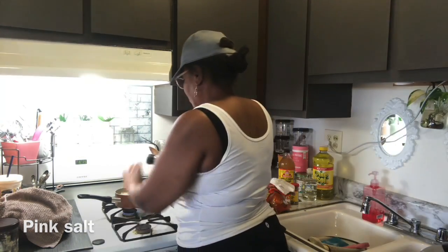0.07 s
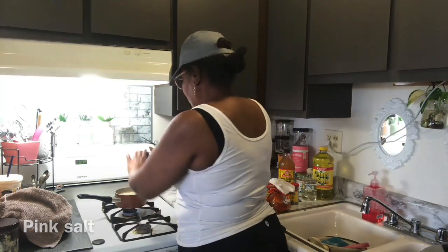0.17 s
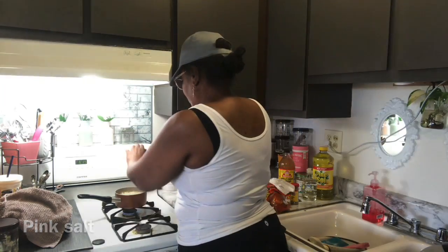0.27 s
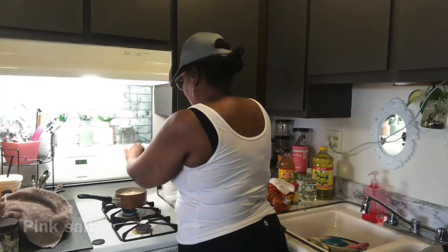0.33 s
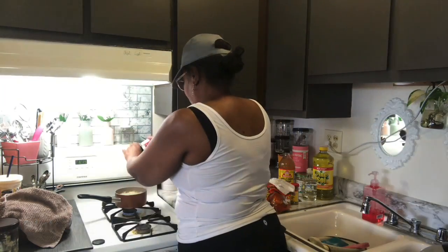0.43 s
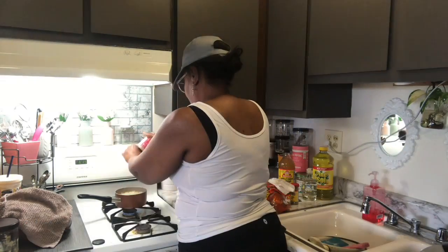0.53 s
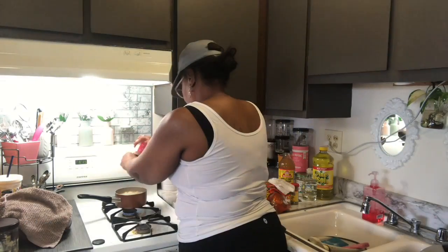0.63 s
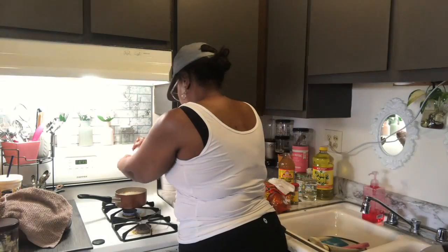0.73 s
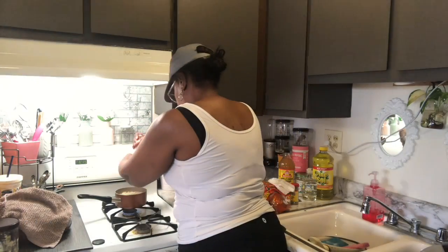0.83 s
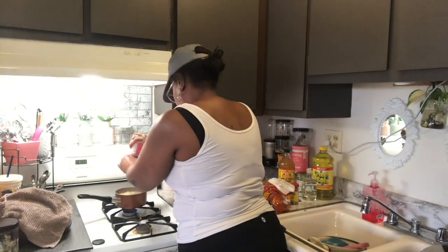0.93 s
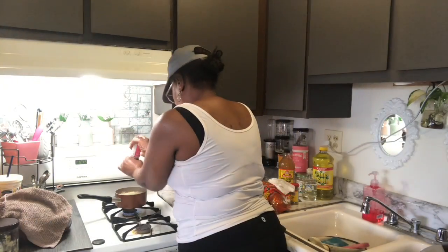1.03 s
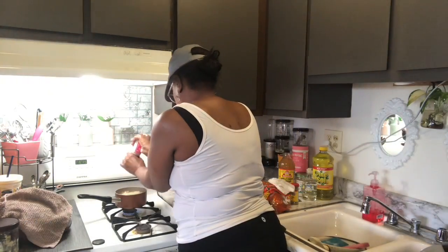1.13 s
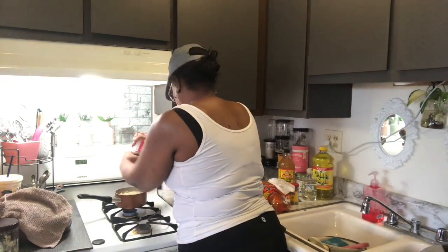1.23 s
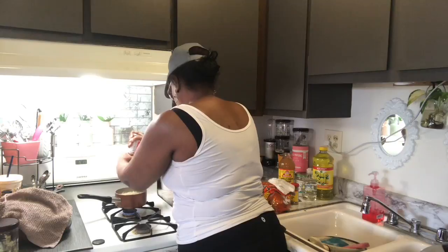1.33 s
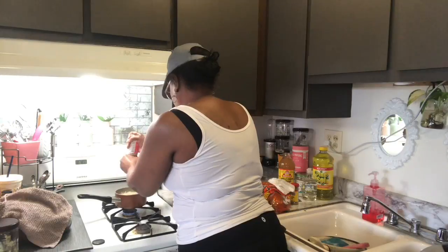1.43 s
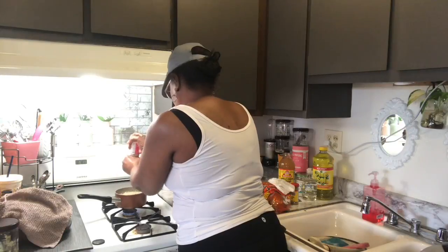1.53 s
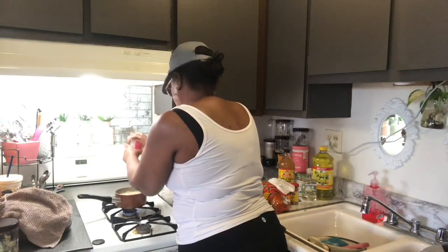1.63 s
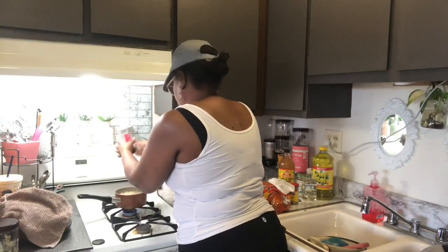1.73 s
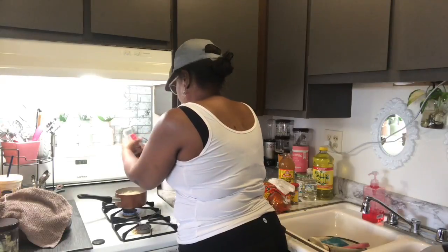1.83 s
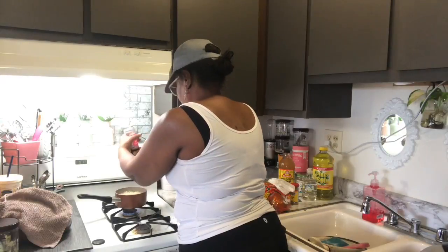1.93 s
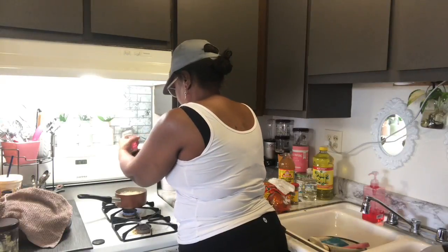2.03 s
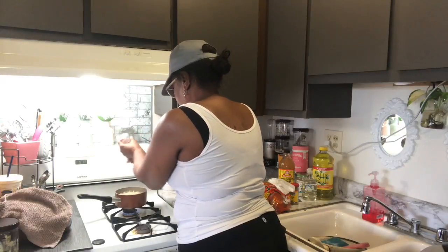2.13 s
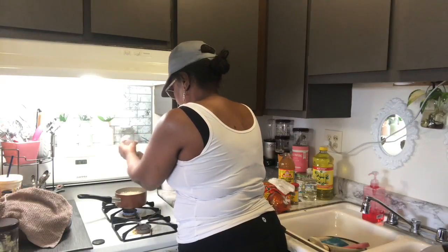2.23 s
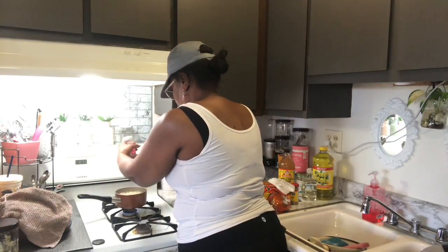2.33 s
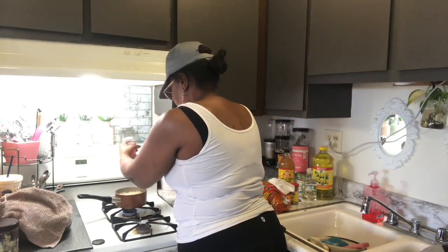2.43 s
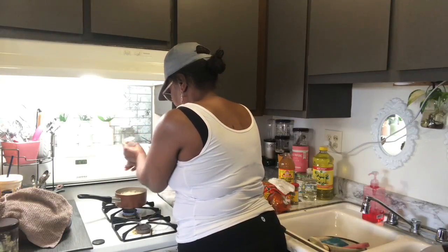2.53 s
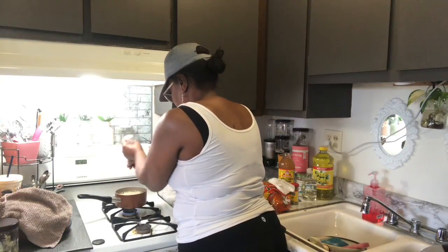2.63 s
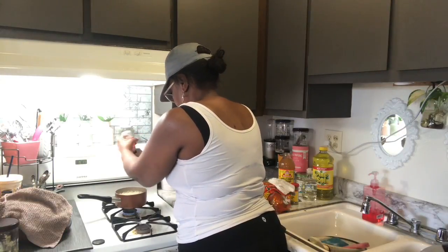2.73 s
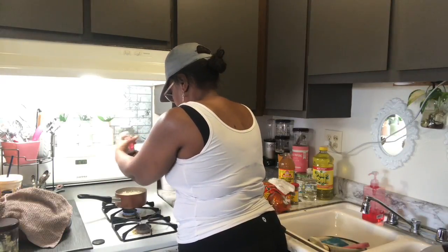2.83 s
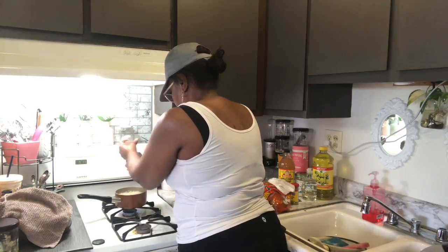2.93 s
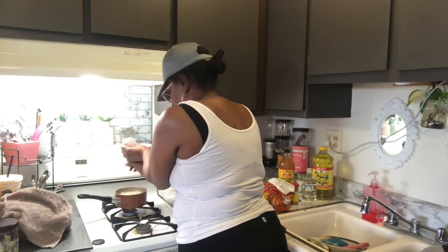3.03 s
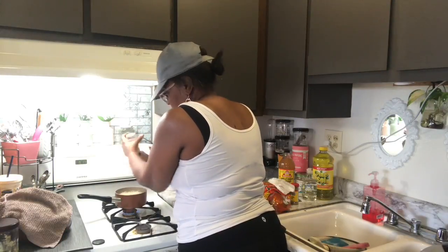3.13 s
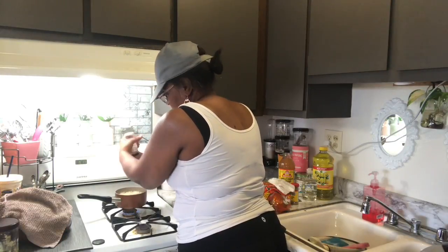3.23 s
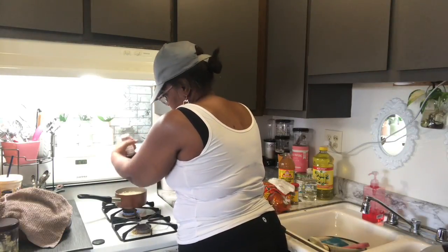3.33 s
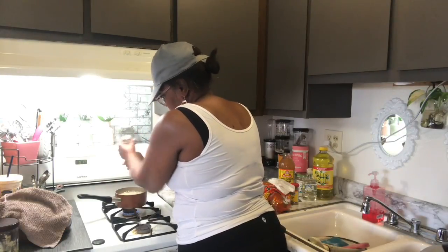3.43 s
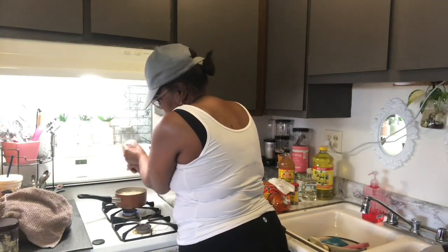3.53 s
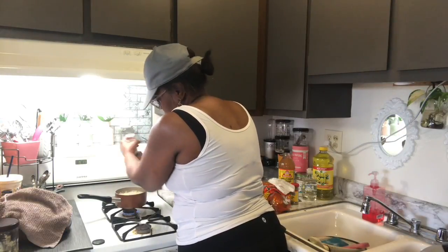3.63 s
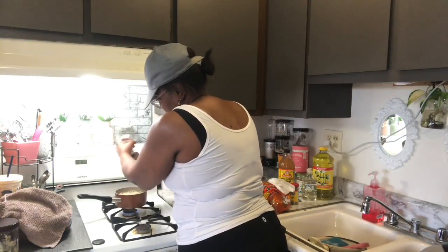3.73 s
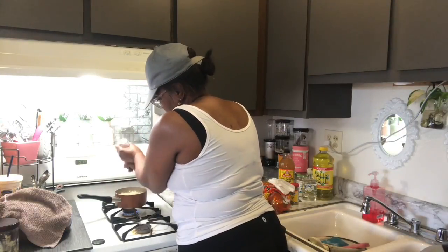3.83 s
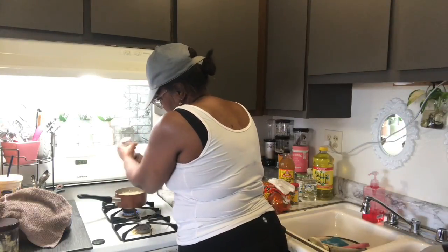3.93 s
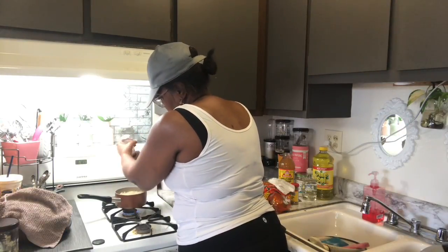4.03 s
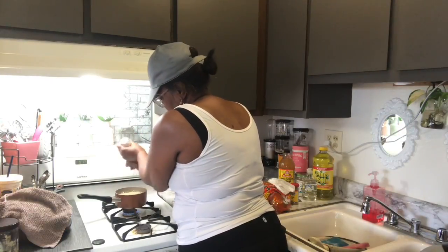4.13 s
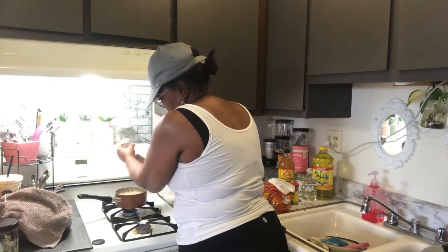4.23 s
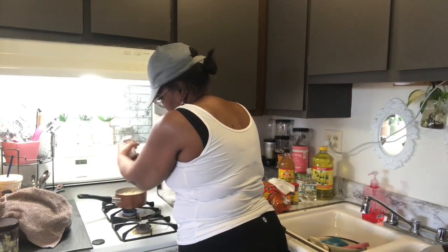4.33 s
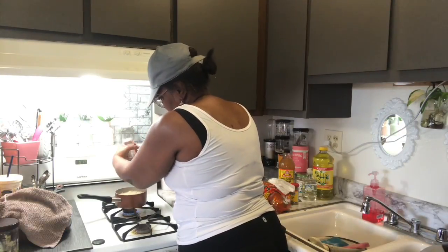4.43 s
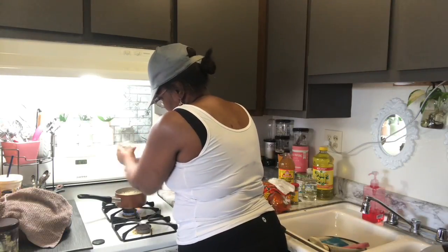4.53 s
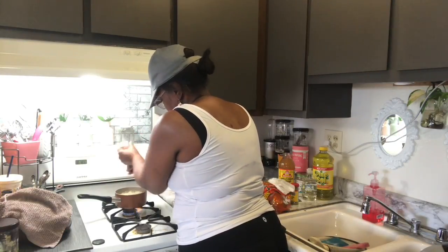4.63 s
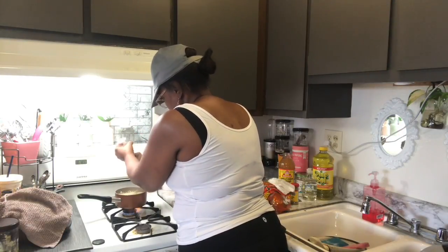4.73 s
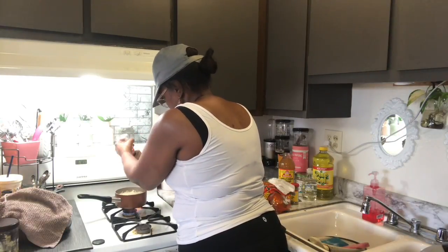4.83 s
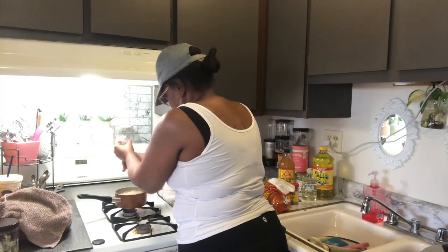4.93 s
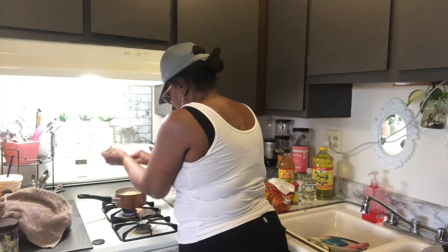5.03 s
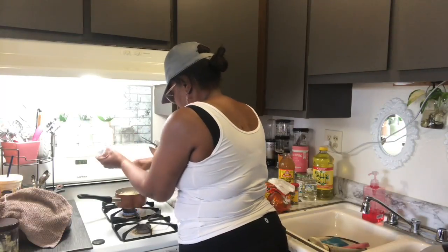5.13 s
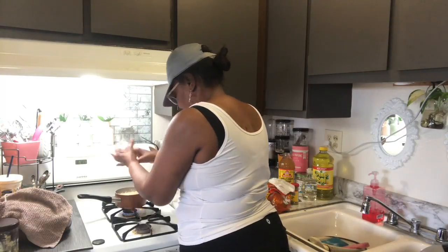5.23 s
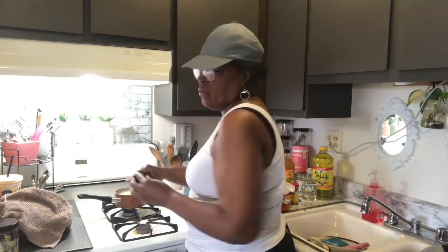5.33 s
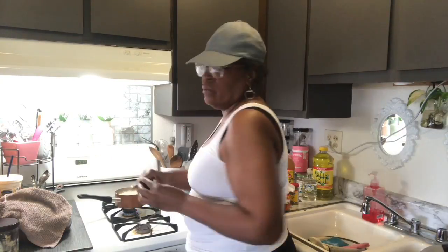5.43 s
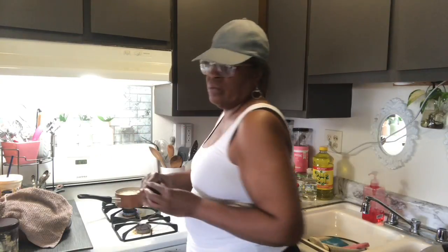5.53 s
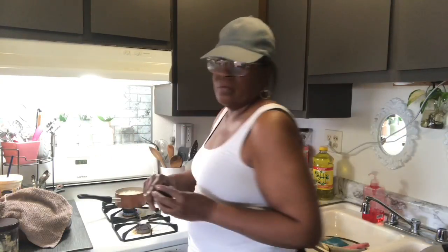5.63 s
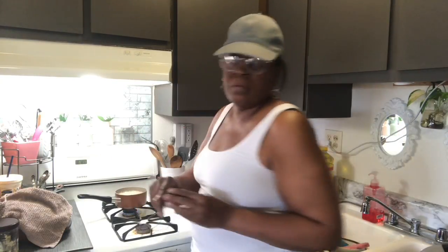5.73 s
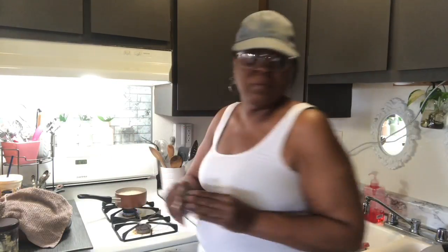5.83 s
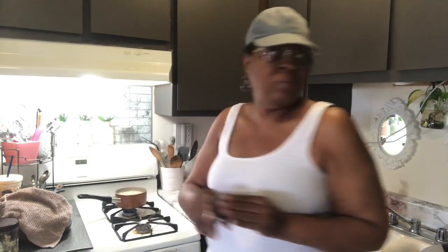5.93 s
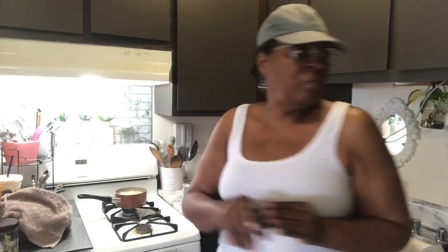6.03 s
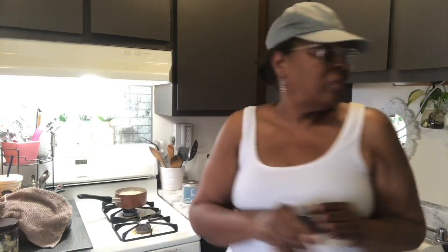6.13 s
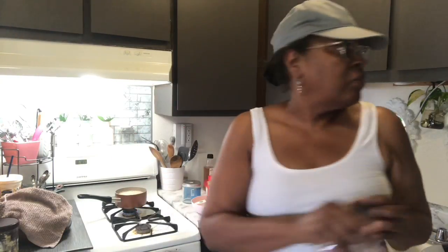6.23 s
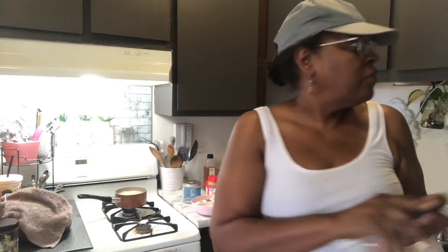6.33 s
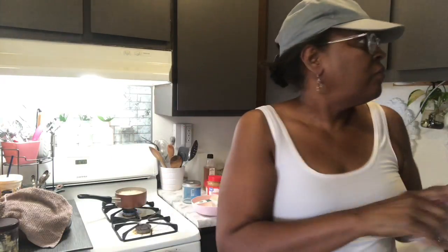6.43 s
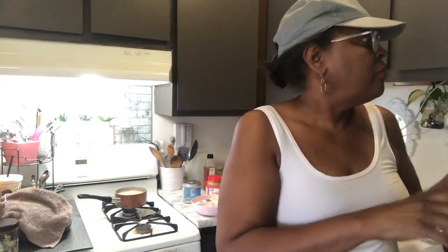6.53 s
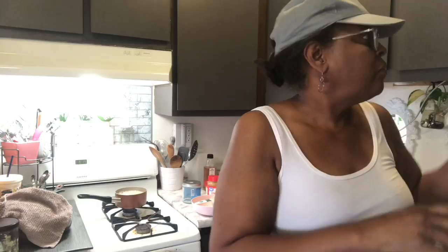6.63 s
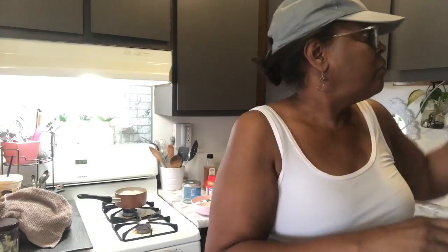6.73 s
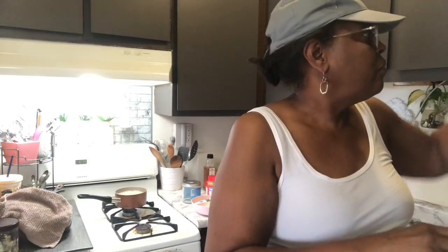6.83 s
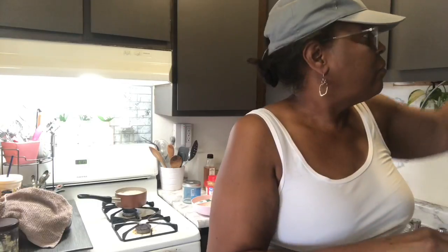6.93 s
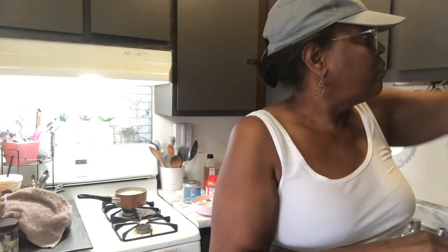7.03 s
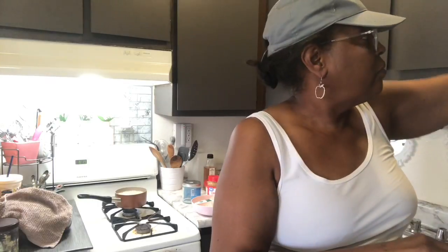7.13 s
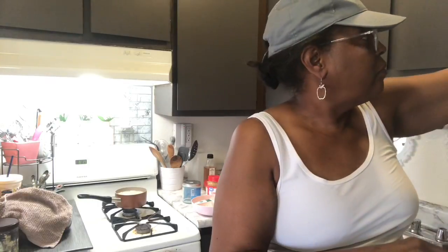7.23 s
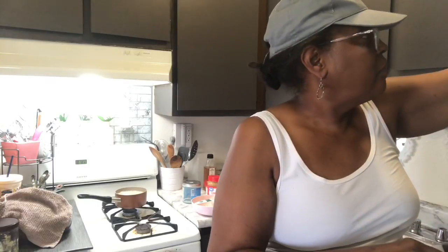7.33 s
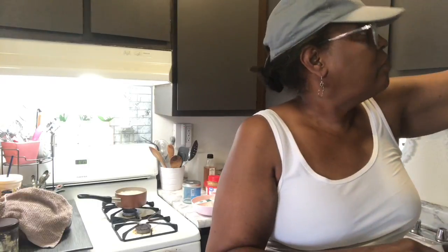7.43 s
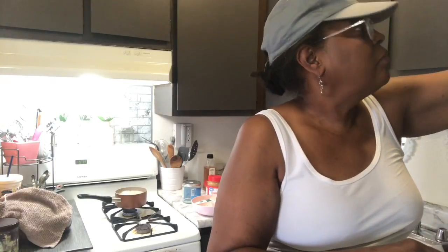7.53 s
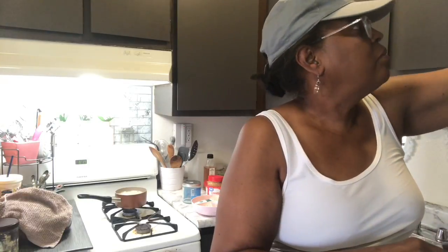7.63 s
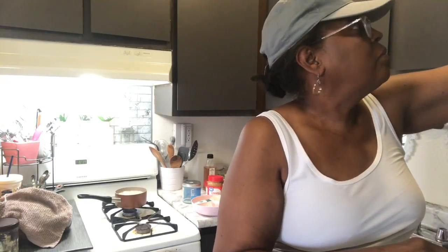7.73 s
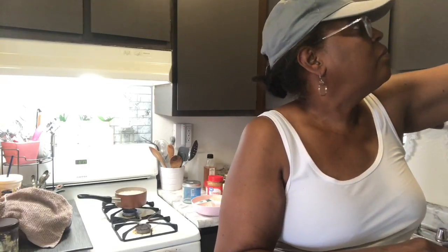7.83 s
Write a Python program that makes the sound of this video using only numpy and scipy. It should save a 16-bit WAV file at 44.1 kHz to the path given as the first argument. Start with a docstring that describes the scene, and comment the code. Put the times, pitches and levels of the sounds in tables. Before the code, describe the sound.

Loose salt rattles briefly in a hand grinder. Then quick twists crack the crystals in uneven, gritty bursts for about four seconds, with one short pause. Fingers rub and tap the jar, and the cap shuts with a sharp snap, the loudest sound. Small ticks and soft hollow thuds follow as it is put away. The microphone picks up light kitchen reverberation, faint room air and a low hum.

```python
"""Loose salt rattles in a hand grinder; then crystals crack under quick twists, ringing its shell.
Hands rub and tap the jar, the cap snaps shut, and it is put away with small ticks and hollow thuds.
The kitchen walls reverberate, and room air and a low hum lie underneath. During the twisting the hum
and the air's rumble sit about an octave higher; the grinding's reverberation is higher and shorter."""
import sys
import numpy as np
from scipy import signal
from scipy.fft import rfft, irfft, next_fast_len
from scipy.io import wavfile
from scipy.ndimage import map_coordinates

SR = 44100
rng = np.random.default_rng(int(sys.argv[2]) if len(sys.argv) > 2 else 0)


def output_pcm(signal):
    """Save a mono or channel-first signal as 16-bit PCM at the path in sys.argv[1].

    Samples are clipped to [-1, 1] before scaling.
    """
    pcm = np.clip(np.atleast_2d(signal).T, -1, 1) * 32767
    wavfile.write(sys.argv[1], SR, np.round(pcm).astype(np.int16))


N = 347633

# turns of the wrist: (start [s], length [s], grit level [dB], treble relative to it [dB])
TWISTS = [(0.496, 0.091, -80, 9.5), (0.847, 0.12, -71, 0), (1.136, 0.099, -63, -15),
          (1.336, 0.089, -76, -13), (2.046, 0.082, -60, -10), (2.21, 0.15, -66, -8),
          (2.447, 0.14, -58.5, -16), (2.64, 0.071, -73, -7), (2.87, 0.18, -67, -16), (3.184, .07, -75, -9),
          (3.352, .12, -62, -13), (3.541, .12, -62, -4.5), (3.757, 0.059, -60, -14),
          (3.854, 0.085, -60, -1), (4.037, 0.096, -58, -16), (4.163, 0.25, -63.5, -4),
          (4.593, 0.14, -76, -6)]


def amp(db):
    return 10 ** (np.asarray(db) / 20)


def unit(x):
    return x / np.sqrt(np.mean(x ** 2) + 1e-20)


def at_peak(x, db):
    return amp(db) * x / np.abs(x).max()


def along(points, hz):
    """Interpolation of (frequency [Hz], value) points on a logarithmic axis."""
    f, v = np.transpose(points)
    return np.interp(np.log(hz + 1), np.log(f + 1), v)


def wobble(per_s):
    """Random modulation: a spline through Gaussian values."""
    return map_coordinates(rng.standard_normal(int(N * per_s / SR) + 4), [np.arange(N) * per_s / SR])


def held(start_s, end_s, rise_s, fall_s):
    """Envelope: linear attack, hold at 1, exponential decay."""
    t = np.arange(N) / SR
    return np.clip((t - start_s) / rise_s, 0, 1) * np.exp(-np.maximum(t - end_s, 0) / fall_s)


def filtered(x, response):
    """Linear filtering: the spectrum of x times a frequency response."""
    m = next_fast_len(len(x) + SR // 2)
    return irfft(rfft(x, m) * response(np.fft.rfftfreq(m, 1 / SR)), m)[:len(x)]


def causal(spectrum):
    """Minimum-phase response of unit energy, made by folding the cepstrum."""
    def response(hz):
        gain = amp(np.maximum(along(spectrum, hz), -80))
        cepstrum = irfft(np.log(gain / np.sqrt(np.mean(gain ** 2))))
        cepstrum[1:len(cepstrum) // 2] *= 2
        cepstrum[len(cepstrum) // 2 + 1:] = 0
        return np.exp(rfft(cepstrum))
    return response


def mode(hz, centre_hz, width_hz):
    """Second-order resonance, gain 1 at its centre."""
    return 1j * hz * width_hz / (centre_hz ** 2 - hz ** 2 + 1j * hz * width_hz)


def grit(n, per_s, spread_db):
    """Shot noise: random impulses of either sign and log-normal size, rms 1."""
    impulses = (rng.random(n) < per_s / SR) * np.sign(rng.random(n) - .5)
    return unit(impulses * amp(spread_db * rng.standard_normal(n)))


def add(track, s, sound):
    """Superposition of a sound on a track, from time s."""
    part = track[round(s * SR):][:len(sound)]
    part += sound[:len(part)]


def room_air(raised):
    """Spectrally shaped noise: rumble and hiss, crossfading to a second colour as raised goes to 1."""
    # spectra of the air's rumble, its usual hiss and its hiss while twisting: (frequency [Hz], level [dB])
    rumble = [(13, -56), (22, -21.5), (75, -5.5), (119, -11.5), (372, -14.5), (466, -20), (592, -22.5),
              (742, -22.5), (800, -24), (1040, -65), (1760, -120)]
    hiss = [(500, -42), (800, -2), (1400, -2), (2800, -3.5), (3600, -7), (4600, -10), (5000, -14.5),
            (5500, -8), (7200, -10), (8500, -15), (10000, -19.5), (10500, -20), (11200, -17.5),
            (15800, -20)]
    twist_hiss = [(940, -30), (1600, -6.5), (2220, -4), (2350, -12), (2610, 1), (3130, -5.5), (3480, -6.5),
                  (4910, -8), (6180, -5.5), (9690, -17), (11300, -17), (13600, -22), (15800, -20)]

    def noise(colour, pitch, db):
        return amp(db) * unit(filtered(rng.standard_normal(N), lambda hz: amp(along(colour, hz / pitch))))
    air = (1 - raised) * (noise(rumble, pitch=0.92, db=-64.5) + noise(hiss, pitch=0.99, db=-68.5))
    air += raised * (noise(rumble, pitch=1.8, db=-64) + noise(twist_hiss, pitch=0.94, db=-67.5))
    return air * amp(1.1 * wobble(6))


def hum(raised, hum_hz=58.4, flicker_db=2):
    """A tone with random phase and amplitude modulation, an octave up where raised is 1."""
    # slow wavering of the hum: (time [s], level [dB])
    wavering = [(0, -73), (.19, -64), (.5, -61), (1.05, -64.5), (1.35, -70.5), (1.86, -61.5), (2.12, -65),
                (2.3, -58), (2.9, -68.5), (3.09, -60.5), (3.3, -71.5), (4.0, -60.5), (4.5, -68.5),
                (4.96, -57.5), (5.45, -61), (5.9, -68), (6.5, -63), (7.88, -63.5)]
    t = np.arange(N) / SR
    phase = 2 * np.pi * hum_hz * t + 0.79 * wobble(4.8)
    level_db = np.interp(t, *np.transpose(wavering)) + flicker_db * wobble(9)
    return amp(level_db) * ((1 - raised) * np.sin(phase) + raised * np.sin(2 * phase))


def background(raise_s=.497, drop_s=5.292):
    """Air and hum superposed; their pitch steps up, and the level dips briefly as it drops back."""
    t = np.arange(N) / SR
    raised = np.clip((t - raise_s) / 0.0053, 0, 1) * (t < drop_s)
    dip = np.clip(np.abs(t - drop_s) / 0.019, .12, 1)
    return (room_air(raised) + hum(raised)) * dip


def walls(x, scale=1):
    """Diffuse reverberation: a new decaying noise tail every 0.2 s, higher and shorter by scale."""
    # the kitchen's decay at scale 1: (frequency [Hz], t60 [s])
    decay_times = [(200, 0.18), (600, 0.49), (2000, 0.29), (6000, 0.36), (14000, 0.17)]
    out, step = np.zeros(N), SR // 5
    for i in range(0, N, step):
        hz, t, noise = signal.stft(rng.standard_normal(SR // 3), SR, nperseg=128)
        decay = amp(-60 * scale * t / along(decay_times, hz / scale)[:, None])
        tail = signal.istft(noise * decay, SR, nperseg=128)[1]
        add(out, i / SR + .003 / scale, signal.fftconvolve(x[i:i + step], tail / np.linalg.norm(tail)))
    return out


def rustle(start_s=4.785, end_s=5.27):
    """Friction noise of skin on the jar, in three bands; the top grows as the grip tightens."""
    # (centre [Hz], width [Hz], starting level [dB], growth [dB/s])
    bands = ((250, 310, -61.5, 0.5), (1970, 1100, -70, 6.1), (11600, 4900, -88, 38))
    rub = grit(N, per_s=7000, spread_db=4) * amp(1.8 * wobble(14))
    elapsed = np.clip(np.arange(N) / SR - start_s, 0, 1)
    skin = sum(amp(db + growth * elapsed) * unit(filtered(rub, lambda hz: mode(hz, centre, width) ** 2))
               for centre, width, db, growth in bands)
    return held(start_s, end_s, rise_s=0.0098, fall_s=0.0098) * skin


def taps(t):
    """Light impacts: a burst of contact noise excites two heavily damped resonances."""
    # fingers and grinder touching things: (time [s], peak [dB], centre [Hz], decay [ms])
    touches = [(0.382, -56, 1330, 6.3), (0.6788, -47.5, 1660, 6.1), (1.558, -50.5, 3000, 4),
               (1.732, -52, 3100, 4.5), (4.7885, -50, 1990, 8.8), (4.9483, -51, 2090, 8.6),
               (4.978, -50, 2030, 10), (5.0854, -48, 2030, 8.4), (5.13, -51, 2680, 9.2),
               (5.215, -42.5, 2050, 6.5), (5.3157, -51, 2250, 5.1), (5.345, -47, 2630, 3.2),
               (5.508, -50, 2080, 7.8), (5.804, -52.5, 1440, 8.2), (5.9123, -49, 2040, 7.6),
               (6.4212, -50.5, 2500, 14), (6.4353, -44.5, 2300, 12), (6.461, -54, 5700, 18),
               (7.0863, -54, 1450, 12), (7.3546, -53.5, 1500, 4.5), (7.4071, -45, 2080, 5.1),
               (7.5294, -56, 1270, 5.9)]
    out = np.zeros(N)
    for s, db, centre, ms in touches:
        rub = grit(len(t), per_s=6800, spread_db=2.5) * np.exp(-1000 * t / ms)
        rub *= 1 - np.exp(-3000 * t / ms)
        ring = filtered(
            rub, lambda hz: mode(hz, centre, 0.89 * centre) ** 2 + 0.095 * mode(hz, 5000, 2900) ** 2)
        add(out, s, at_peak(ring, db))
    return out


def ticks(t):
    """Short noise bursts excite high resonances: a faint jingle."""
    # small ticks: (time [s], peak [dB])
    strikes = [(6.7655, -60), (6.7984, -60), (6.8174, -60), (6.8788, -65), (6.9321, -55.5)]
    # their resonances: (centre [Hz], width [Hz], gain [dB])
    modes = [(5840, 670, 1), (6460, 750, -3), (7100, 770, -11), (13700, 260, -4)]
    out = np.zeros(N)
    for s, db in strikes:
        burst = grit(len(t), per_s=4500, spread_db=0) * np.exp(-t / .006)
        tick = filtered(burst, lambda hz: sum(amp(g) * mode(hz, c, w) ** 2 for c, w, g in modes))
        add(out, s, at_peak(tick, db))
    return out


def cap_snap(t):
    """The cap's impulse response is a click; dense early reflections follow in the same colour."""
    # the cap touches, then shuts: (time [s], peak [dB])
    contacts = [(6.002, -37.5), (6.023, -9.5)]
    # the cap's response: (frequency [Hz], level [dB])
    cap = [(70, -43), (160, -8), (330, -0.5), (450, -5), (900, -12.5), (1250, -7), (1800, 3.5),
           (2400, -1.5), (3000, -8), (3700, -3.5), (4800, -10.5), (6500, -11.5), (11000, -20), (15800, -31)]
    clicks, reflections = np.zeros(N), np.zeros(N)
    for s, db in contacts:
        add(clicks, s, at_peak(filtered(1. * (t == 0), causal(cap)), db))
        arrivals = grit(len(t), per_s=8300, spread_db=2.5) * np.exp(-t / 0.0059)
        add(reflections, s + .001, at_peak(filtered(arrivals, causal(cap)), db - 6.5))
    return clicks, reflections


def thuds(t):
    """Damped oscillation: each knock rings one low mode of slightly unsteady pitch."""
    # hollow knocks of jar and cupboard: (time [s], level [dB], frequency [Hz], t60 [s])
    knocks = [(6.0226, -30.5, 326, 0.048), (6.0222, -37.5, 196, 0.092), (6.434, -47, 415, 0.062),
              (6.76, -51.5, 385, 0.095), (7.409, -47, 354, 0.047), (7.437, -45.5, 131, 0.11),
              (7.806, -40.5, 137.4, 0.2)]
    out = np.zeros(N)
    attack = 1 - np.exp(-t / 0.003)
    for s, db, hz, t60 in knocks:
        phase = 2 * np.pi * hz * t + 0.77 * wobble(60)[:len(t)]
        add(out, s, amp(db - 60 * t / t60) * np.sin(phase) * attack)
    return out


def salt_rattle(slide_db=-42.5, slide_s=0.054, fade_db_per_s=194):
    """Granular collisions: loose salt slides and excites the jar's resonances."""
    # big crystals hitting the wall: (time [s], level [dB])
    lumps = [(.0085, -39), (0.0166, -35), (.0436, -22)]
    # the jar's response: (frequency [Hz], level [dB])
    jar = [(250, -17), (530, -9.5), (700, -11.5), (850, -8), (1400, -17), (1850, -12.5), (2200, -4),
           (2700, 0), (3250, -5.5), (3700, -20), (4500, -26), (5500, -20), (7000, -29.5), (12000, -45)]
    level_db = slide_db - fade_db_per_s * np.maximum(np.arange(N) / SR - slide_s, 0)
    impacts = amp(level_db) * grit(N, per_s=4500, spread_db=2.0)
    for s, db in lumps:
        add(impacts, s, amp([db]))
    return filtered(impacts, causal(jar))


def clink(t):
    """Free vibration: the grinder's halves knock together and ring at slightly random strengths."""
    # modes of the halves: (frequency [Hz], level [dB], t60 [s])
    modes = [(1340, -9.5, 0.09), (1390, -14, 0.062), (2890, 0.5, 0.022)]
    return sum(amp(db + rng.normal(0, 2.1) - 60 * t / t60) * np.sin(2 * np.pi * hz * t)
               for hz, db, t60 in modes)


def fine_grit(grip_s=0.011, let_go_s=0.03, trickle_db=-78):
    """Shot noise of salt milled in each turn and trickling between turns; returns (dull, bright)."""
    envelope = sum(amp([[db], [db + treble_db]]) * held(s, s + length, grip_s, let_go_s)
                   for s, length, db, treble_db in TWISTS)
    envelope += amp(trickle_db) * held(TWISTS[0][0], sum(TWISTS[-1][:2]), grip_s, let_go_s)
    return envelope * grit(N, per_s=2300, spread_db=6.0)


def small_cracks(per_s=25, over_grit_db=5.5, spread_db=5, bright_db=2, crumble_ms=1.7):
    """A random point process: rows for small crystals that break at chance moments of each turn."""
    rows = []
    for s, length, db, _ in TWISTS:
        chances, places, sizes = rng.random((12, 3)).T
        for place, size in zip(places[chances < per_s * length / 12], sizes):
            level_db = db + over_grit_db + spread_db * (2 * size - 1)
            rows.append((s + place * length, level_db, bright_db, crumble_ms))
    return rows


def fractures(t):
    """Brittle fracture: crystals crumble into grains, with a dull shudder and bright splinters."""
    # crystals heard one by one: (time [s], level [dB], splinters relative to it [dB], crumble [ms])
    cracks = [(0.527, -68, 14, 3), (0.536, -67, 13, 4), (0.5983, -52, -1, 4.1), (0.6284, -37, -17, 6.8),
              (0.64, -34, -8, 2.8), (0.678, -42, -20, 3.7), (0.7285, -54, -21, 3.3),
              (0.7958, -52, -21, 4.2), (0.8665, -41, 3.5, 4.2), (0.882, -34, 1.5, 5),
              (0.9215, -39.5, 4.5, 3.2), (0.9514, -25.5, -8, 2.8), (1.1533, -46, -6, 6.3),
              (1.1787, -40.5, -1, 7), (1.2356, -32, -4.5, 5.1), (1.2505, -36, -7, 3.5),
              (1.3661, -33, -9, 5.1), (1.3908, -32, -35, 3.2), (1.4449, -49, -22, 5.4),
              (1.478, -52, -23, 4.4), (2.0602, -37.5, -3, 7.2), (2.081, -38.5, -9, 11),
              (2.106, -34, -15, 4.6), (2.1195, -39.5, -22, 5.6), (2.2356, -36.5, -5, 15),
              (2.248, -24.5, -8, 3.6), (2.288, -28.5, -15, 3.5), (2.3022, -43, 7, 2.1),
              (2.313, -32.5, -9.5, 3.8), (2.4516, -33, -12, 3.2), (2.4728, -34.5, -23, 5.5),
              (2.4796, -34, -4.5, 5.4), (2.5357, -28, -8.5, 4.2), (2.672, -36, -18.5, 3.9),
              (2.679, -43, 1, 2.7), (2.7855, -49.5, -11, 6), (2.897, -45, -26, 9.2),
              (2.919, -32.5, -15, 6.4), (2.9322, -42, -19.5, 9.6), (2.9858, -33, -13.5, 3.9),
              (3.1097, -54, -12, 5.2), (3.196, -37, -22, 7.7), (3.216, -40, -1.5, 4.1),
              (3.2308, -35.5, -15, 3.9), (3.2388, -41.5, -3, 2.7), (3.3624, -40.5, -15, 7.5),
              (3.405, -28.5, -15, 5.2), (3.468, -46.5, -17, 4.5), (3.549, -35, -19, 3.5),
              (3.5719, -27, -9, 6.6), (3.581, -25.5, -9, 5.2), (3.59, -29.5, -15, 8.9),
              (3.609, -39.5, -15, 8.3), (3.793, -38, -24, 6), (3.805, -36.5, -19, 4.1),
              (3.8256, -48, -28, 2), (3.867, -33.5, -27.5, 7.6), (3.9011, -26.5, -0.5, 5),
              (3.9154, -35.5, 7.5, 3.1), (3.954, -45, 7.5, 3.9), (4.058, -35.5, -9, 6.9),
              (4.0825, -41.5, -18, 8.3), (4.1607, -38, -4, 5.4), (4.211, -23.5, -3, 4.3),
              (4.2675, -47.5, 7, 8.7), (4.292, -46, -1.5, 12), (4.3274, -29, -1, 4.2),
              (4.3987, -31.5, -8, 5.2), (4.4443, -50, -18, 4.4), (4.4844, -60, 2, 5.6),
              (4.5338, -50, -13, 5), (4.635, -40, -25, 4.2), (4.686, -54.5, 3, 8), (4.709, -32.5, -9, 3.5),
              (4.7508, -51, -2, 4.5)]
    # crystals that give way slowly: (time [s], level [dB], length [ms])
    crunches = [(.842, -57, 21), (1.144, -51, 17), (1.34, -59, 22), (2.196, -53.5, 48), (2.639, -52.5, 18),
                (2.876, -52.5, 30), (3.744, -53.5, 32), (4.037, -49.5, 23), (4.258, -45, 23),
                (4.312, -45, 24)]
    dull, bright = np.zeros(N), np.zeros(N)
    for s, db, bright_db, crumble_ms in cracks + small_cracks():
        shape = np.exp(-1000 * t / crumble_ms)
        shape *= 1 - np.exp(-1000 * t / (0.37 * crumble_ms))  # a long crumble starts softly
        add(dull, s, amp(db) * shape * grit(len(t), per_s=9000, spread_db=1.5))
        add(bright, s, amp(db + bright_db) * shape * grit(len(t), per_s=5000, spread_db=4))
    for s, db, ms in crunches:
        swell = np.sin(np.pi * np.clip(1000 * t / ms, 0, 1))
        add(dull, s, amp(db) * swell * grit(len(t), per_s=8100, spread_db=6))
        add(bright, s, amp(db - 12) * swell * grit(len(t), per_s=6200, spread_db=-8))
    return dull, bright


def grinder():
    """Forced vibration: breaking salt drives the burr and the shell rings with it; one clink joins in."""
    # the burr's response: (frequency [Hz], level [dB])
    burr = [(530, -75), (900, -26.5), (1620, -21), (2010, -20), (2210, -18), (2810, -11), (3090, -4),
            (3700, -4.5), (4030, -2.5), (5980, -0.5), (7880, -10.5), (13500, -2.5), (15800, -11.5)]
    # the shell's resonances: (centre [Hz], width [Hz], relative gain [dB])
    shell_modes = [(3530, 260, 1), (4003, 81, 6), (4420, 276, 3.5), (5320, 82, -3), (6200, 9.1, -4),
                   (6300, 47, -3)]
    t = np.arange(SR // 16) / SR
    dull, bright = fractures(t)
    fine_dull, fine_bright = fine_grit()
    lowpass = lambda hz: 1 / (1 + 1j * hz / 10000) ** 3
    highpass = lambda hz: (1 - lowpass(hz)) ** 2
    shell = lambda hz: 1 + amp(-1.0) * sum(amp(db) * mode(hz, c, w) for c, w, db in shell_modes)
    force = filtered(dull + fine_dull, lowpass) + filtered(bright + fine_bright, highpass)
    out = filtered(filtered(force, causal(burr)), shell)
    add(out, s=3.1975, sound=amp(-36) * clink(t))
    return out


def scene():
    """Superposition of direct sound and reverberation, in mono."""
    t = np.arange(SR // 8) / SR  # time within one contact
    mix = background()
    grinding = grinder()
    mix += grinding + amp(-5) * walls(grinding, scale=2.4)
    mix += rustle()
    handling = taps(t) + ticks(t)
    clicks, early_reflections = cap_snap(t)
    handling += clicks + thuds(t)
    mix += salt_rattle() + early_reflections + handling + amp(-3.5) * walls(handling)
    return mix[None]


def record(dry, edge_hz=15800, top_hz=16500):
    """Band limiting: the treble steps down at edge_hz and ends at top_hz."""
    return filtered(dry[0], lambda hz: np.where(hz < edge_hz, 1, amp(-22)) * (hz < top_hz))[None]


dry = scene()
out = record(dry)
output_pcm(out)
```